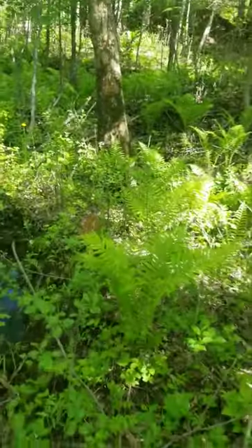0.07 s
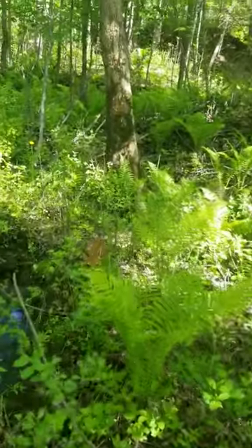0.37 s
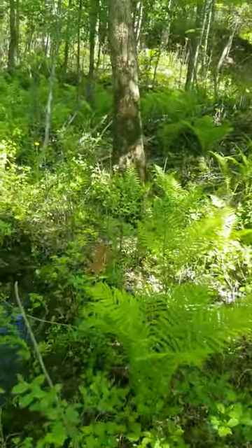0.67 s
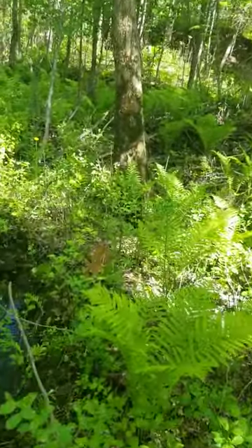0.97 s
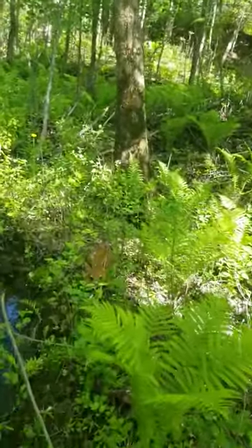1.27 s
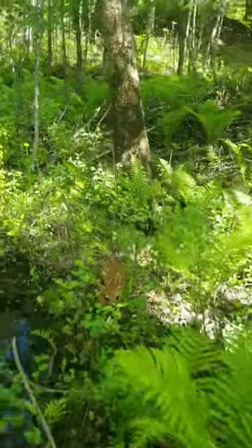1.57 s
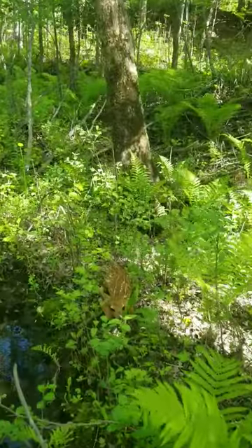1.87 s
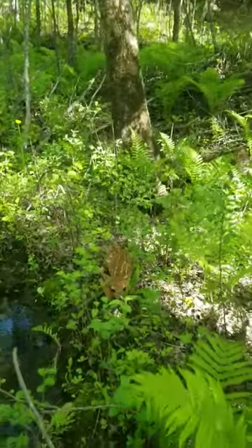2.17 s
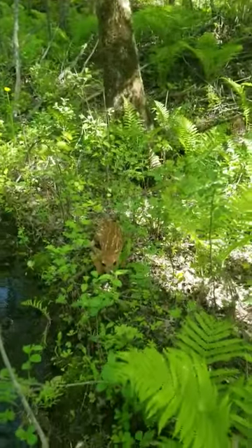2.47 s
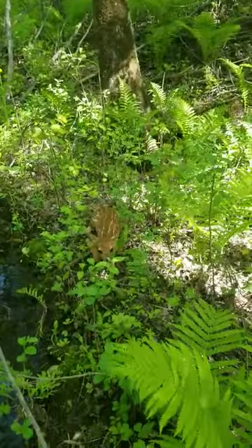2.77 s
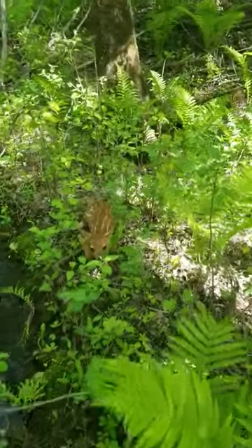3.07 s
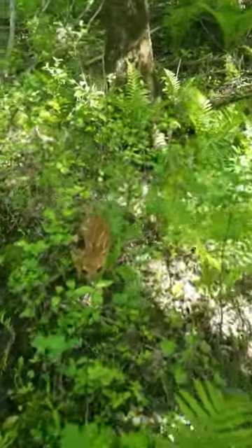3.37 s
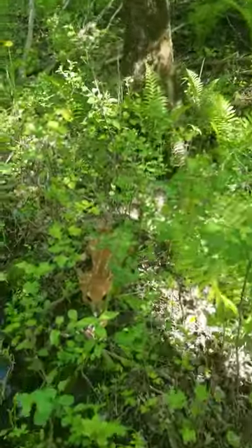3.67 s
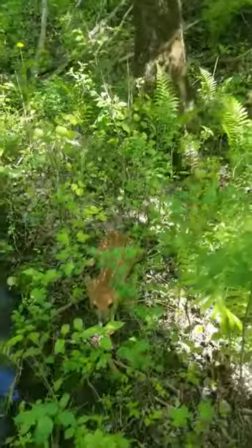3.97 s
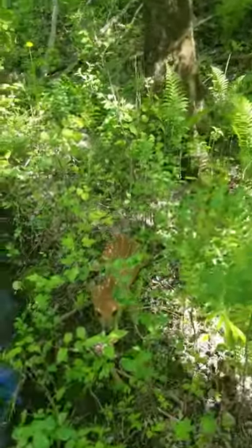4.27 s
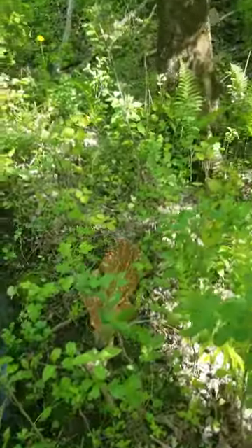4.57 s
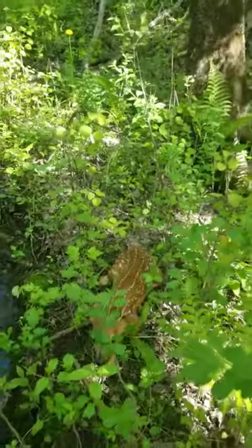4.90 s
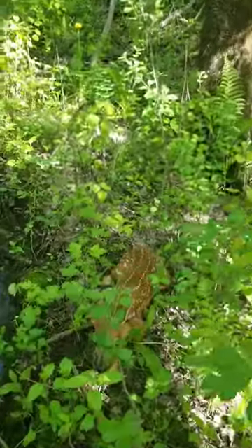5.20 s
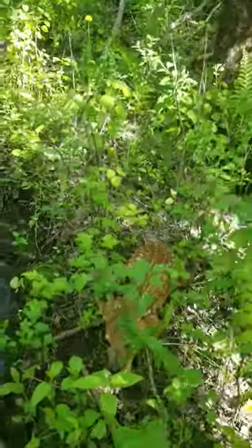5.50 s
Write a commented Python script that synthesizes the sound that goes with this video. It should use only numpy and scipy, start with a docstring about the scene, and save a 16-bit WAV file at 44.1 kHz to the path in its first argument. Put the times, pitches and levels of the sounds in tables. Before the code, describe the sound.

Slow, uneven steps move through ferns in a damp wood, heard close on a hand-held microphone. It opens with a crisp swish of fronds and several sharp twig snaps in the first 0.2 seconds, followed by smaller cracks. Two tiny bubbles blip from the wet ground near 1 second, and a few fainter ones come around 2, 3.8 and 5.1 seconds. Another brush and a bright snap arrive at about 1.5 seconds. From 2 to 3 seconds it is quieter, with soft crunches of damp leaves and low, dull footfalls. At about 3.3 seconds a step lands with a thud, a swish and a cluster of snaps. From 4.2 seconds the leafy rustling becomes nearly continuous, dotted with small cracks, and swells at about 5.6 seconds. Throughout, a light wind murmurs faintly in the trees and gives a soft rumble on the microphone.

```python
"""Slow steps through ferns

Fronds brush and crackle along the legs while soles press the leaf litter of a damp wood floor.
Dry stems and twigs snap, wood and roots knock dully, and the wet ground gives off a few bubbles.
Light wind murmurs in the trees and touches the hand-held microphone."""
import sys
import numpy as np
from scipy import signal
from scipy.fft import rfft, irfft, next_fast_len
from scipy.io import wavfile
from scipy.ndimage import uniform_filter1d, map_coordinates

SR = 44100
rng = np.random.default_rng(int(sys.argv[2]) if len(sys.argv) > 2 else 0)


def unload_audio(sound):
    """Save the sound as a 16-bit wav file, at the path given as the first command line argument."""
    columns = np.transpose(np.atleast_2d(sound))
    # keep every value between -1 and 1, then stretch to whole-number steps
    steps = np.round(np.clip(columns, -1, 1) * 32767)
    wavfile.write(sys.argv[1], SR, steps.astype(np.int16))


N = 248724

# stereo image of the leaves: f/Hz, left-right likeness (1 and above is mono)
LEAF_LIKENESS = [(100, 2.5), (500, 0.83), (1500, 0.5), (3000, 0.53), (6000, 0.14), (14000, -0.33)]


def amp(db):
    """Decibels to gain."""
    return 10 ** (np.asarray(db) / 20)


def unit(x):
    """Scale to rms 1."""
    return x / np.sqrt(np.mean(x ** 2) + 1e-20)


def along(points, hz):
    """Read (f/Hz, value) points on a log frequency axis."""
    f, v = np.transpose(points)
    return np.interp(np.log(hz + 1), np.log(f + 1), v)


def wobble(rate):
    """A smooth random curve with `rate` knots a second."""
    knots = rng.standard_normal(int(N * rate / SR) + 4)
    return map_coordinates(knots, [np.arange(N) * rate / SR])


def filtered(x, response):
    """Zero-phase EQ; response gives the gain at each frequency."""
    m = next_fast_len(N + 8192)
    return irfft(rfft(x, m) * response(np.fft.rfftfreq(m, 1 / SR)), m)[..., :N]


def struck(x, colour_db):
    """Minimum-phase EQ for a short burst, so that nothing sounds before the blow."""
    n = x.shape[-1]
    cepstrum = irfft(np.log(amp(colour_db(np.fft.rfftfreq(n, 1 / SR)))))
    cepstrum[1:n // 2] *= 2
    cepstrum[n // 2 + 1:] = 0
    return irfft(rfft(x) * np.exp(rfft(cepstrum)))


def add(track, s, sound):
    """Mix a short sound in at s seconds."""
    part = track[..., max(round(s * SR), 0):][..., :sound.shape[-1]]
    part += sound[..., :part.shape[-1]]


def stereo(pair, spectrum, likeness):
    """Two unrelated signals become a coloured left and right of rms 1."""
    def mid_side_gains(hz):
        angle = np.arccos(np.clip(along(likeness, hz), -1, 1)) / 2
        return amp(along(spectrum, hz)) * np.array([np.cos(angle), np.sin(angle)])
    mid, side = filtered(pair, mid_side_gains)
    return unit(np.array([mid + side, mid - side]))


def crackle(rate, spread_db, t60):
    """Tiny fractures of uneven size, `rate` a second, each a quickly dying burst of noise."""
    size = amp(spread_db * np.minimum(rng.standard_normal(N), 2.6))
    energy = (rng.random(N) < rate / SR) * size ** 2
    decay = amp(-120 / (t60 * SR))
    envelope = np.sqrt(signal.lfilter([1], [1, -decay], energy))
    return unit(envelope * rng.standard_normal((2, N)))


def patchy(x, depth_db, size=512):
    """Every leaf has its own tone: the colour of the rustle shifts from moment to moment."""
    spectra = signal.stft(x, nperseg=size)[2]
    patches = uniform_filter1d(rng.standard_normal(spectra.shape[1:]), size=5, axis=0)
    patches = uniform_filter1d(patches, size=4, axis=1)
    return signal.istft(spectra * amp(depth_db * unit(patches)), nperseg=size)[1][:, :N]


def stroke(s, rise, hold, sag_db_per_s, release_s):
    """Envelope of one contact: it swells, sags and lets go; rise and release each span 20 dB."""
    t = np.arange(N) / SR - s
    swell_db = 20 * np.minimum(t, 0) / max(rise, 1 / SR)
    release_db = 20 * np.maximum(t - hold, 0) / release_s
    return amp(swell_db - sag_db_per_s * np.maximum(t, 0) - release_db)


def wind(trees_db=-64, buffet_trim_db=-1):
    """A steady murmur in the trees and a soft, lumpy rumble of air on the microphone's ports."""
    # spectrum of the treetop murmur: f/Hz, level/dB
    trees_eq = [(25, -6), (70, -2), (200, 0), (420, 0), (1000, -2.5), (2000, -1.5), (3500, -3.5),
                (6000, -5.5), (15000, -13.5)]
    # spectrum of the rumble: f/Hz, level/dB
    buffet_eq = [(15, -19), (32, -22), (50, -1), (80, -5), (130, -15), (250, -22), (800, -65)]
    # gusts on the microphone, before trim: t/s, level/dB
    gusts = [(0.1, -59), (0.3, -70.5), (0.83, -66), (1.0, -78), (1.33, -62.5), (1.7, -71.5), (2.03, -55),
             (2.36, -60.5), (3.5, -63.5), (3.65, -56.5), (4.07, -61.5), (4.25, -65.5), (4.7, -63),
             (5.6, -56)]
    sway_db, lumps_db = .7 * wobble(2), 1.2 * wobble(10)
    gust_db = np.interp(np.arange(N) / SR, *np.transpose(gusts))
    trees = stereo(rng.standard_normal((2, N)), trees_eq, [(100, 0.85), (400, 0.28), (1200, 0.05)])
    buffet = stereo(rng.standard_normal((2, N)), buffet_eq, [(40, 0.27), (110, 0.8)])
    return amp(trees_db + sway_db) * trees + amp(gust_db + buffet_trim_db + lumps_db) * buffet


def bubbles(t60=.065, glide=2.5, attack_s=.002):
    """Each bubble from the wet ground rings briefly and rises a little in pitch."""
    # bubbles: t/s, starting f/Hz, level/dB
    blips = [(0.885, 1120, -38), (0.975, 1000, -40.5), (1.888, 865, -44.5), (1.985, 1610, -50),
             (2.105, 863, -43), (3.745, 734, -41), (3.825, 663, -41.5), (5.088, 610, -47),
             (5.106, 900, -43)]
    out, t = np.zeros(N), np.arange(SR // 10) / SR
    for s, hz, db in blips:
        envelope = amp(db - 60 * t / t60) * (1 - np.exp(-t / attack_s))
        add(out, s, envelope * np.sin(2 * np.pi * hz * (t + glide * t ** 2)))
    return out


def thuds(trim_db=-3, t60=0.062, size=8192):
    """A sole meets roots and soil: a short, dull thud."""
    # thuds, before trim: t/s, peak level/dB
    hits = [(2.044, -50), (2.159, -57), (2.437, -41.5), (2.733, -50), (3.314, -39), (3.609, -43)]
    # body of the soil: f/Hz, level/dB
    soil_eq = [(30, -6), (120, -5), (260, 2.5), (550, -24), (1000, -13), (4000, -46)]
    out, t = np.zeros(N), np.arange(size) / SR
    for s, db in hits:
        burst = amp(-60 * t / t60) * rng.standard_normal(size)
        thud = struck(burst, lambda hz: along(soil_eq, hz))
        add(out, s, amp(db + trim_db) * thud / np.abs(thud).max())
    return out


def litter(trim_db=-1):
    """Damp leaves and sticks crunch dully under the sole and pack down until the weight comes off."""
    # footfalls, before trim: full weight t/s, level/dB, rise/s, hold/s
    presses = [(0.05, -52.5, 0.42, 0.082), (0.42, -61.5, 0.04, 0.15), (0.66, -58.5, 0.19, 0.032),
               (1.0, -60.5, 0.62, 0.11), (1.53, -53.5, 0.42, 0.13), (2.02, -56, 0.34, 0.28),
               (2.83, -62, 0.15, 0.015), (3.008, -47.5, 0.024, 0.048), (3.31, -47.5, 0.27, 0.014),
               (3.6, -50.5, 0.44, 0.22), (3.99, -55.5, 0.14, 0.013), (4.42, -50, 0.52, 0.025),
               (4.69, -57.5, 0.33, 0.027), (5.11, -53, 0.3, 0.11), (5.41, -48, 0.4, 0.033),
               (5.62, -50, 0.16, 0.03)]
    # spectrum of the damp crunch: f/Hz, level/dB
    litter_eq = [(40, -24), (120, -6.5), (220, -4), (340, 2), (550, -2.5), (950, -4.5), (1600, -7),
                 (3000, -20), (8000, -48)]
    crunch = crackle(rate=380, spread_db=3.0, t60=0.036)
    power = sum((amp(db) * stroke(s, rise, hold, sag_db_per_s=15.5, release_s=0.26)) ** 2
                for s, db, rise, hold in presses)
    return amp(trim_db) * np.sqrt(power) * stereo(crunch, litter_eq, LEAF_LIKENESS)


def twigs(crack=1.7, fibre_t60=0.0045, scatter_db=-12, scatter_t60=0.029, ring_width=0.13, size=4096):
    """Wood snaps, tearing its fibres, or knocks dully; it rings briefly and plants scatter the sound."""
    # snapping stems and twigs, and a few dull woody knocks:
    # t/s, attack level/dB, ring f/Hz, woody depth/dB, dry brightness/dB
    hits = [(0.059, -22, 2110, 6, -4.5), (0.1093, -21.5, 1930, -8, 0.5), (0.186, -24.5, 6900, 3.5, -2),
            (0.246, -37.5, 4840, -6, 2), (0.2859, -39, 2200, -3, -15.5), (0.4075, -35, 1500, 3.5, -24),
            (0.4171, -39, 3430, 18.5, 6.5), (0.586, -43, 860, 9, 8), (0.6354, -29.5, 6300, -12, 14),
            (0.645, -33.5, 3720, 8.5, 0.5), (0.6866, -30, 4140, -15.5, -6), (0.769, -43, 4840, -1, 19),
            (0.824, -45, 750, 6.5, -3.5), (1.2979, -34.5, 2100, -9, 6), (1.474, -25.5, 6700, 28, 37),
            (1.5541, -40.5, 900, -4, -41), (1.8226, -29, 2240, 2, 8), (2.0443, -40, 525, 0, -31),
            (2.4367, -48, 570, 13, -15), (3.2935, -27.5, 3720, 1.5, -3.5), (3.3269, -23.5, 6130, -1, 11),
            (3.348, -29, 760, 16.5, 10), (3.383, -34.5, 6050, -1, 11), (3.467, -26.5, 1730, -7.5, -8),
            (3.779, -41.5, 5470, -12, -5.5), (4.1416, -47.5, 1010, 3, -34), (4.2552, -35, 6240, 2, 14),
            (4.452, -37.5, 1690, 7, -11), (4.487, -29, 6310, -6, 9), (4.504, -35, 2800, 3, -10),
            (4.5634, -40.5, 5640, 1, -3), (4.624, -33.5, 1800, 0, -0.5), (4.681, -33, 5770, -12, 9),
            (4.8828, -37, 4970, -7, -1), (5.281, -36.5, 2000, -8, 6), (5.5738, -28.5, 5660, -8, -5)]
    # spectrum common to all twigs: f/Hz, level/dB
    twig_eq = [(40, -8.5), (260, -7), (420, 1.5), (900, -2.5), (1400, 1.5), (1950, -1.5), (2800, 2),
               (6000, 2), (15000, 5)]
    out, t = np.zeros((2, N)), np.arange(size) / SR
    for s, db, ring_hz, depth_db, bright_db in hits:
        burst = crack * (t == 0) + amp(-60 * t / fibre_t60) * rng.standard_normal(size)
        scatter = amp(scatter_db - 60 * t / scatter_t60) * rng.standard_normal((2, size))
        tilt = [(600, depth_db), (1800, 0), (12000, bright_db)]
        modes = [(ring_hz, 8), (2.76 * ring_hz, 5)]  # a stick's lowest bending modes: f/Hz, lift/dB
        ring = lambda hz: sum(lift / (1 + ((hz / f - 1) / ring_width) ** 2) for f, lift in modes)
        hit = struck(burst + scatter, lambda hz: along(twig_eq, hz) + along(tilt, hz) + ring(hz))
        attack_rms = np.sqrt(np.mean(hit[:, :round(.006 * SR)] ** 2))
        add(out, s, amp(db) * hit / attack_rms)
    return out


def fronds(trim_db=1, stir_db=-59.5, treble_hz=7000):
    """Fronds fizz over cloth, slip off and spring free; leaf edges catch and tiny stalks crack."""
    # sweeps along a leg, before trim: full contact t/s, level/dB, rise/s, hold/s, dry treble/dB
    sweeps = [(0.039, -34.5, 0.29, 0.068, 0.5), (0.2, -45, 0.058, 0.074, -0.5),
              (0.38, -48, 0.12, 0.042, -0.5), (0.65, -49, 0.067, 0.38, 1), (1.306, -36, 0.015, 0.017, 2),
              (1.47, -41, 0.31, 0.25, -1.5), (1.828, -48.5, 0.011, 0.0, 5), (2.07, -51, 0.16, 0.15, -12),
              (2.62, -49.5, 0.13, 0.27, -2.5), (3.012, -42.5, 0.008, 0.1, -2),
              (3.09, -42, 0.08, 0.036, -0.5), (3.29, -33, 0.16, 0.0041, -0.5),
              (3.47, -44.5, 0.42, 0.15, -3.5), (3.76, -50.5, 0.35, 0.092, -10),
              (3.95, -48, 0.19, 0.028, -4), (4.251, -44, 0.18, 0.17, 2), (4.419, -35.5, 0.14, 0.034, -2),
              (4.614, -37, 0.06, 0.0081, -0.5), (4.75, -41.5, 0.23, 0.12, -3), (4.99, -40, 0.15, 0.0, -4.5),
              (5.149, -41, 0.075, 0.13, -3), (5.34, -37.5, 0.17, 0.021, -1.5),
              (5.48, -40, 0.076, 0.027, 2.5), (5.6, -31, 0.06, 0.05, -4.5)]
    # spectrum of the rustle: f/Hz, level/dB
    leaf_eq = [(150, -42), (600, -10.5), (1200, -4), (1900, -1), (2400, -3), (3300, -2.5), (4500, -1.5),
               (6200, -1), (10000, -0.5), (15000, -1)]
    slide = crackle(rate=4000, spread_db=3, t60=.007)
    cracks = amp(-5) * crackle(rate=260, spread_db=5.5, t60=.005)
    rustle = stereo(patchy(slide + cracks, depth_db=2.2), leaf_eq, LEAF_LIKENESS)
    treble = filtered(rustle, lambda hz: 1 / (1 + (treble_hz / (hz + 1)) ** 4))
    body = rustle - treble
    body_power = treble_power = amp(stir_db) ** 2  # leaves keep stirring between sweeps
    for s, db, rise, hold, dry_db in sweeps:
        sweep = amp(db) * stroke(s, rise, hold, sag_db_per_s=21.5, release_s=0.15)
        body_power = body_power + sweep ** 2
        treble_power = treble_power + (amp(dry_db) * sweep) ** 2  # dry leaves fizz higher than fresh
    flutter_db = .8 * wobble(45)
    return amp(trim_db + flutter_db) * (np.sqrt(body_power) * body + np.sqrt(treble_power) * treble)


def scene(lead_samples=19):
    """Steps over a bed of wind; nearer the right port, they are earlier and a little louder there."""
    # pan of the steps: f/Hz, left minus right level/dB
    balance = [(300, 1.5), (800, -1.5), (1500, -3.5), (3000, -0.5), (5500, -1.5), (9000, -2), (14000, -5)]
    left, right = fronds() + litter() + twigs() + thuds() + bubbles()
    steps = np.array([np.pad(left, (lead_samples, 0))[:N], right])
    panned = filtered(steps, lambda hz: amp(np.outer([.5, -.5], along(balance, hz))))
    return panned + wind()


def record(dry, top_hz=16700):
    """The microphone's ports hollow the treble; nothing passes above the band limit."""
    # colour of the microphone: f/Hz, level/dB
    mic_eq = [(6500, 2), (7400, -5), (8700, -7), (10500, -3.5), (12500, 0), (15000, -2)]
    # roll-off into the band limit: f/Hz, level/dB
    roll_off = [(15300, 0), (15700, -14), (16700, -32)]
    return filtered(dry, lambda hz: amp(along(mic_eq, hz) + along(roll_off, hz)) * (hz < top_hz))


dry = scene()
out = record(dry)
unload_audio(out)
```